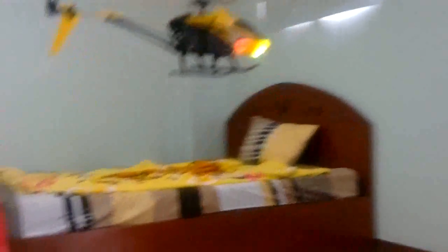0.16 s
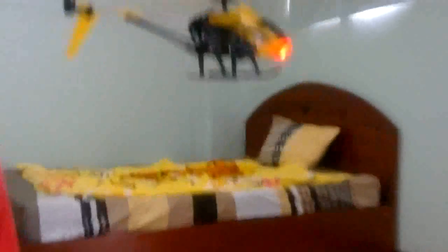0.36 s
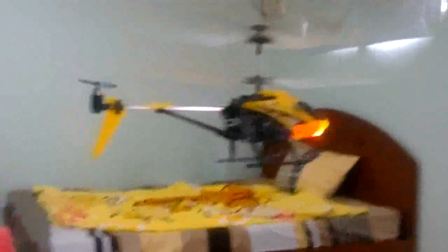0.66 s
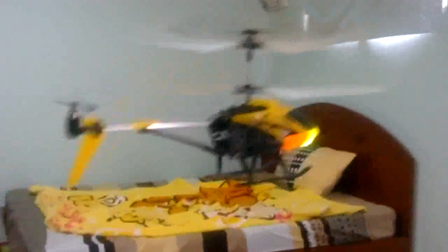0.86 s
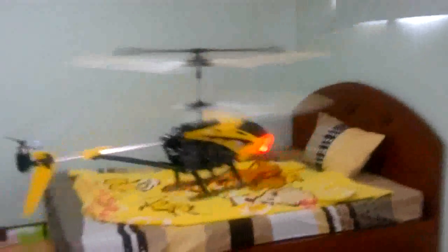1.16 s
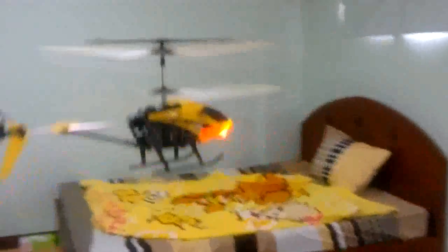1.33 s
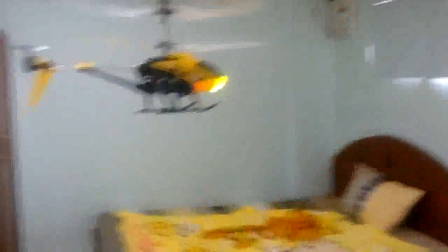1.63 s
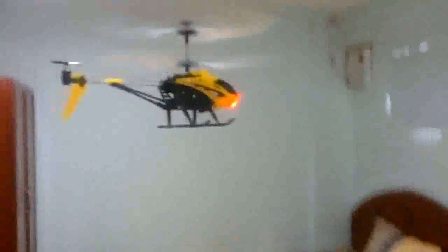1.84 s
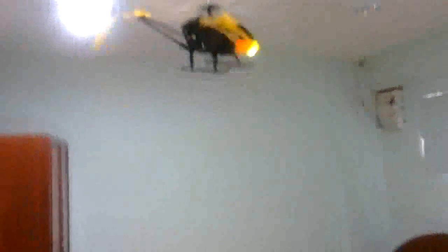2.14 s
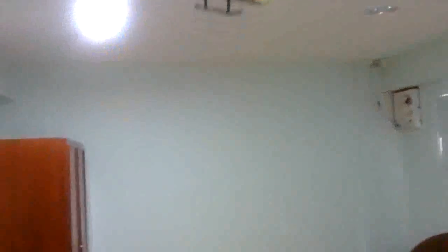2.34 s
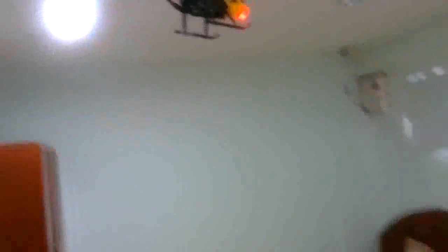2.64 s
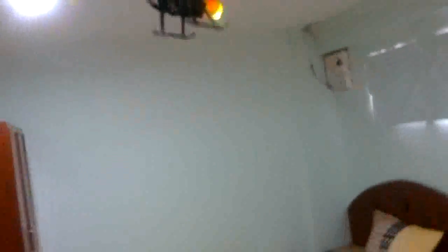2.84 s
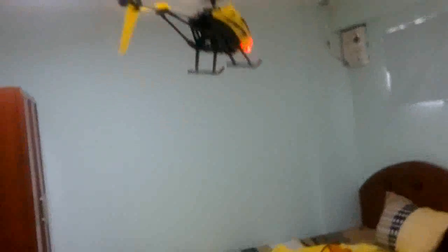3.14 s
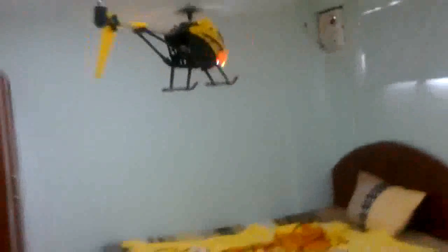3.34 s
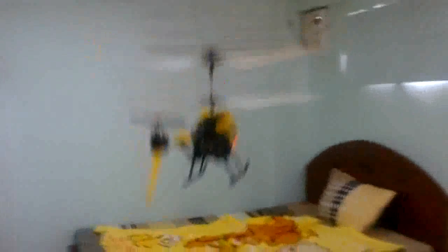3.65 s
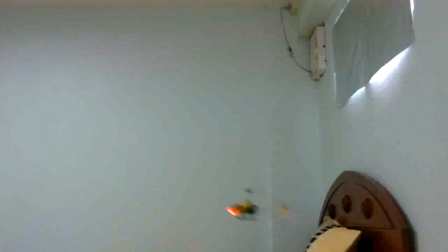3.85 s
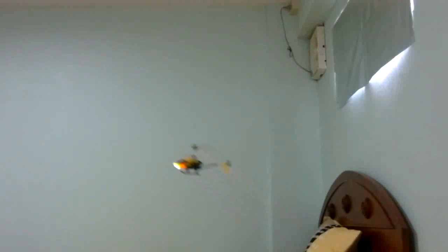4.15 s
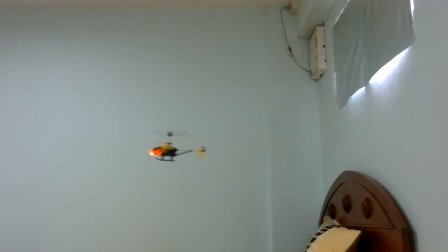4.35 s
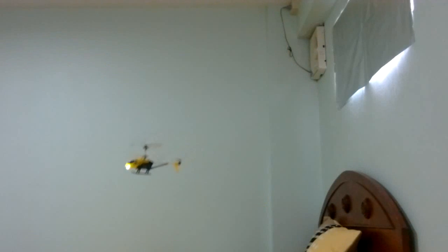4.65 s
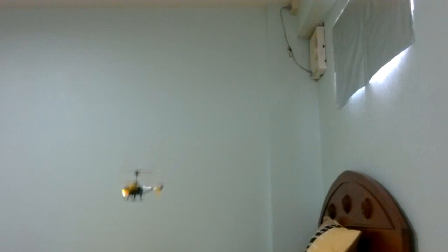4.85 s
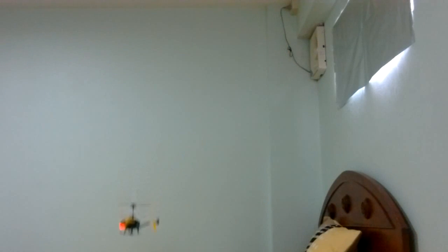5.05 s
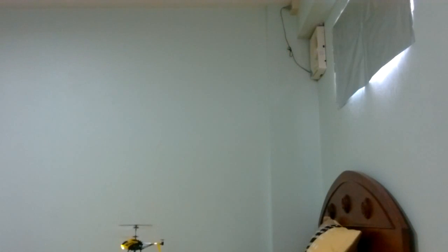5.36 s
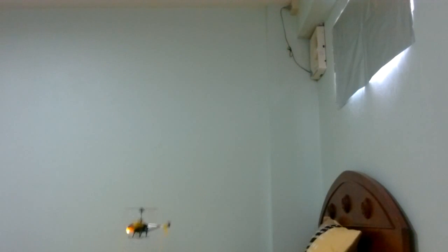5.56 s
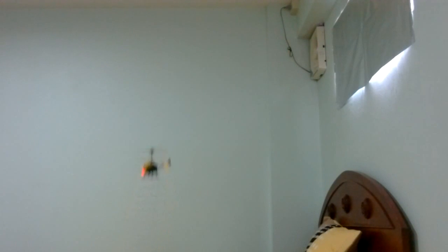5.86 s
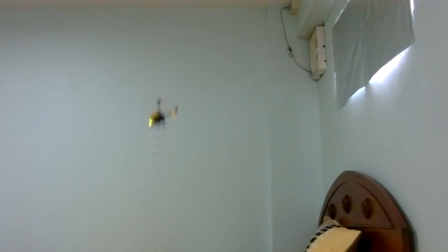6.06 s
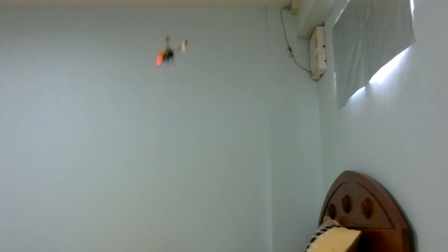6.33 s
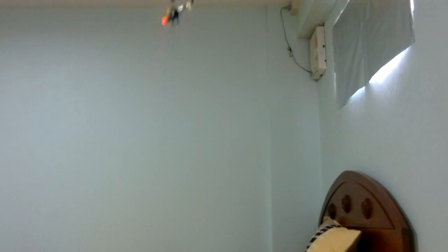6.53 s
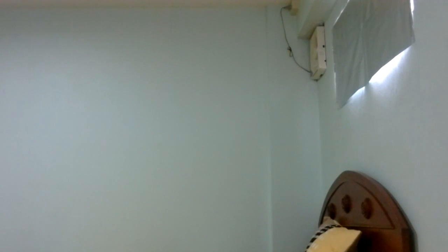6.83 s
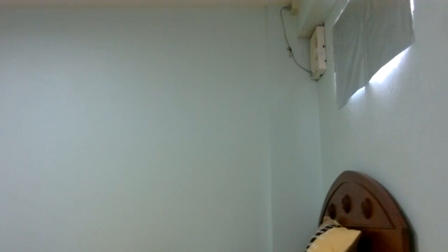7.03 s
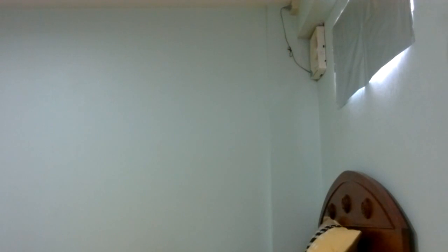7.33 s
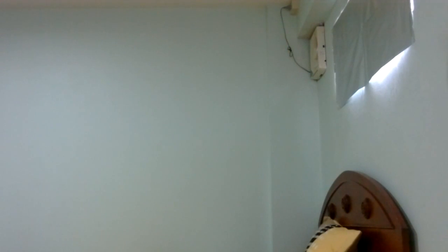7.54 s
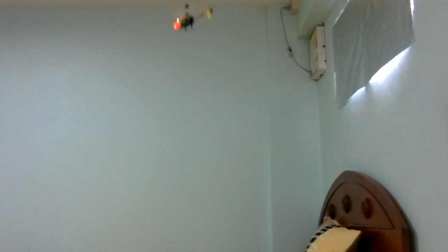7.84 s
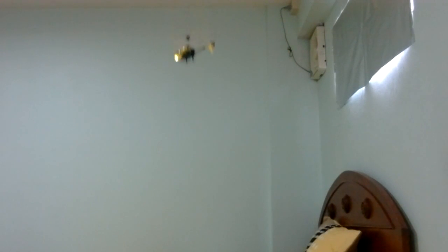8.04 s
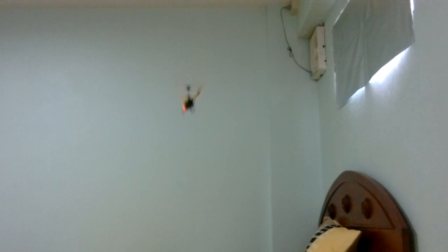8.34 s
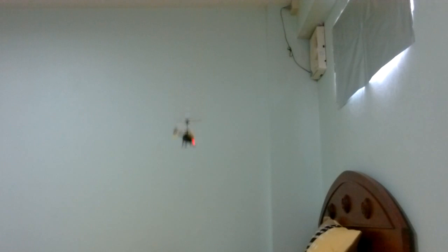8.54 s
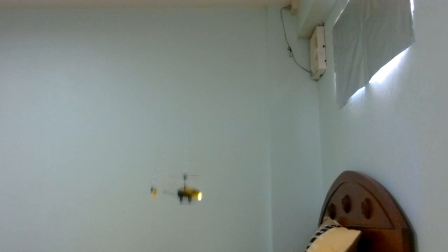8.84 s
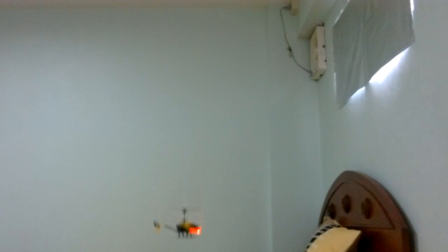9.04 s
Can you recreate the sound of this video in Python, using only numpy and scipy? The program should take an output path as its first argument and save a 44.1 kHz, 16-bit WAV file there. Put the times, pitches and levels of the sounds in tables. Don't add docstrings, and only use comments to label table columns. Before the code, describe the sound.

From the start a toy helicopter whines close by in a small hard-walled bedroom: two unsteady gear tones around 2.5 and 2.75 kHz, rough and beating, with gritty plastic hiss, thin overtones, weak motor hum and soft blade thrum. Pitch holds fairly steady until about 2.1 s, sags quickly by 2.5 s, then partly recovers around 2.9 s. At about 3.85 s the sound drops to silence for a twentieth of a second and returns abruptly, roughly half as loud and more distant. The whine falls from 4.2 to about 4.9 s, climbs strongly to a peak near 6 s with quick pitch kicks, then sinks gradually toward 7.75 s. Another brief upward kick comes near 8.4 s, and it rises again to the end at 9.2 s. Faint low rumble and handling bumps lie underneath; the highest treble is missing.

```python
import sys
import numpy as np
from scipy import signal
from scipy.fft import rfft, irfft, next_fast_len
from scipy.io import wavfile
from scipy.ndimage import uniform_filter1d, map_coordinates

SR = 44100
rng = np.random.default_rng(int(sys.argv[2]) if len(sys.argv) > 2 else 0)


def int16_out(signal):
    q = np.round(np.clip(np.atleast_2d(signal).T, -1, 1) * 32767)
    wavfile.write(sys.argv[1], SR, q.astype(np.int16))


def undo_db(level):
    steps = np.asarray(level, float) / 20
    return 10 ** steps


N = 405279
TIME = np.arange(N) / SR

TEETH = 7
CHOP_HZ = 541
BLADE_PASS = 0.0603
CUT_START_S, CUT_END_S = 3.8482, 3.8948
BEAM_S, MODE_S = 0.16, 0.19
# time_s, apparent_distance_m
DISTANCE = [(0, 0.98), (2.1, 0.99), (2.5, 1.11), (3.1, 0.91), (3.85, 1.02), (3.89, 1.79), (4.55, 2.2),
            (5.4, 1.88), (6.1, 2.23), (6.5, 2.35), (7.0, 2.14), (7.85, 2.3), (8.3, 2.02), (8.75, 2.03),
            (9.19, 1.74)]


def unit(x):
    return x / np.sqrt(np.mean(x ** 2) + 1e-20)


def along(points, hz):
    f, v = np.transpose(points)
    return np.interp(np.log(hz + 1), np.log(f + 1), v, left=v[0], right=v[-1])


def curve(rows):
    s, value = np.transpose(rows)
    return np.interp(TIME, s, value)


def wobble(rate):
    knots = rng.standard_normal(int(N * rate / SR) + 4)
    return map_coordinates(knots, [np.arange(N) * rate / SR])


def swells(rows, half_s):
    return sum(db * np.exp(-((TIME - s) / half_s) ** 2) for s, db in rows)


def filtered(x, response):
    m = next_fast_len(N + SR // 2)
    return irfft(rfft(x, m) * response(np.fft.rfftfreq(m, 1 / SR)), m)[:N]


def rush(spectrum, patchy_db, bins, frames):
    z = signal.stft(rng.standard_normal(N), nperseg=1024)[2]
    patches = uniform_filter1d(rng.standard_normal(z.shape), size=bins, axis=0)
    patches = uniform_filter1d(patches, size=frames, axis=1)
    noise = signal.istft(z * undo_db(patchy_db * unit(patches)), nperseg=1024)[1][:N]
    return unit(filtered(noise, lambda hz: undo_db(along(spectrum, hz))))


def turns(hz):
    return 2 * np.pi * np.cumsum(hz) / SR


def tone(phase, fade_db, blur):
    return np.sqrt(2) * undo_db(fade_db * wobble(9)) * np.sin(phase + blur * wobble(40))


def speed(throttle, nudges):
    steering = sum(hz * np.exp(-np.abs((TIME - s) / half) ** 3) for s, half, hz in nudges)
    return curve(throttle) + 3 * wobble(9) + steering


def motor(hz, rings, crests, orders, hiss_db, eccentric):
    mesh_db = hiss_db + along(rings, hz) + swells(crests, half_s=0.075)
    surge = np.abs(uniform_filter1d(np.gradient(hz) * SR, size=2000))
    mesh = turns(hz + 0.012 * surge * wobble(70))
    warble = 1 + eccentric * np.sin(BLADE_PASS / 4 * mesh) + 0.2 * wobble(60)
    mesh_gain = undo_db(mesh_db - 0.0028 * surge)
    main = mesh_gain * warble * undo_db(2.4 * wobble(32)) * tone(mesh, fade_db=0, blur=0.27)
    rest = 0
    for k, db in orders:
        flicker = undo_db(2.5 * wobble(25))
        line = tone(mesh * k / TEETH, fade_db=2.5, blur=0.072 * k)
        rest = rest + undo_db(hiss_db + db) * line * flicker
    return main, rest, mesh


def lower_motor(hz, hiss_db):
    # mesh_hz, level_db over the gear hiss
    rings = [(2150, -8.5), (2250, -4.5), (2480, -4), (2650, -6.5)]
    # time_s, change_db
    crests = [(.3, 6), (.47, 11.5), (.62, 5), (.98, 9.5), (1.38, 2), (1.97, 10), (2.28, 8.5), (2.5, 1.5),
              (2.88, 3.5), (3.24, 6.5), (3.38, 7), (3.68, 3.5), (4.02, 1), (4.18, 7.5), (4.45, 5.5),
              (5.17, 9), (5.38, 4), (5.56, 2), (5.75, -15), (6.1, -2), (6.45, 8.5), (6.75, 9), (6.98, 12.5),
              (7.25, 4), (7.55, 2.5), (7.8, 6.5), (8.18, 3)]
    # order, level_db over the gear hiss
    orders = [(6, -11), (6.72, -16), (7.3, -19), (8, -18), (9, -14), (21, -24)]
    return motor(hz, rings, crests, orders, hiss_db, eccentric=0.2)


def upper_motor(hz, hiss_db):
    # mesh_hz, level_db over the gear hiss
    rings = [(2400, -12.5), (2500, -4.5), (2580, -2), (2760, 1), (3000, 1.5), (3200, -1)]
    # time_s, change_db
    crests = [(.12, -10.5), (0.501, -6), (.63, 4.5), (0.749, -0.5), (1.03, -7), (1.35, 5.5), (1.43, -5),
              (2.0, 0.5), (2.25, -13), (2.38, 6), (3.05, 4), (3.5, -3.5), (3.68, 5), (3.89, -15), (4.62, 6),
              (4.75, -11), (5.12, -8), (5.22, 8), (5.75, 5), (6.55, 7), (6.88, -3), (7.0, 3), (7.25, 2),
              (7.38, -14), (8.0, 5), (8.22, -7), (8.5, -3), (8.6, 3.5), (9.09, 9.5), (9.19, -16)]
    # order, level_db over the gear hiss
    orders = [(5, -15), (6.7, -19), (7.28, -17), (8, -14), (20, -24), (21, -19)]
    return motor(hz, rings, crests, orders, hiss_db, eccentric=0.18)


def chopping_sidebands(low_mesh, up_mesh, chop, hiss_db):
    # chop_multiple, level_db over the gear hiss
    weak_bands = [(2, -18), (-1, -22.5)]
    # time_s, rise_db
    beams = [
        (4.55, 10.2),
        (4.95, 14),
        (7.5, 5),
    ]
    upper = 0
    for k, db in weak_bands:
        phase = up_mesh + k * chop + 0.8 * wobble(90)
        upper = upper + undo_db(hiss_db + db) * tone(phase, fade_db=4.5, blur=0.9)
    lower = undo_db(hiss_db - 18 + swells(beams, BEAM_S)) * tone(low_mesh + chop, fade_db=2.0, blur=0.44)
    return upper / curve(DISTANCE) ** 0.85 + lower


def shell_radiation(x):
    # freq_hz, gain_db
    radiates = [(1700, -17), (2200, -2.5), (2900, 0.5), (3250, -4.5), (3550, -10.5), (3830, 7),
                (4300, -2.5), (5200, -2), (6200, -2), (8300, 0.5), (9500, 0.5)]
    return filtered(x, lambda hz: undo_db(along(radiates, hz)))


def beamed_overtones(low_hz, up_hz, low_mesh, up_mesh, chop, hiss_db):
    # freq_hz, level_db over the gear hiss
    doubles = [
        [(4300, -15), (4600, -14), (4950, -11), (5300, -14.5)],
        [(4750, -6.5), (5150, -8.5), (5550, -7.5), (5750, -15), (6400, -14)],
    ]
    # time_s, change_db
    glide_dips = [
        (2.27, -11),
        (4.15, -4),
        (5.25, -14),
        (7.8, -2),
        (8.9, -2),
    ]
    # freq_hz, level_db over the gear hiss
    sideband = [(2900, -3.5), (3000, -5.5), (3110, -10), (3300, -14.5), (3500, -26)]
    # time_s, rise_db
    beams = [(2.0, 5.8), (3.45, 7.8), (4.1, 14), (5.25, 17), (5.6, 16), (7.75, 11.2), (8.55, 13.3),
             (9.15, 12)]
    low_db, up_db = [
        along(ring, 2 * hz) + wobble(4) + swells(glide_dips, BEAM_S)
        for ring, hz in zip(doubles, (low_hz, up_hz))
    ]
    band_db = along(sideband, up_hz + CHOP_HZ)
    sixth_db = -15.5 + swells(beams, BEAM_S)
    # phase, radians of fast tooth jitter, dB over the gear hiss
    lines = [
        (2 * low_mesh, 0.8, low_db),
        (2 * up_mesh, 0.9, up_db),
        (up_mesh + chop, 0.3, band_db),
        (up_mesh * 6 / TEETH, 0.3, sixth_db),
    ]

    def flicker():
        return undo_db(3 * wobble(35) - 2)

    out = undo_db(hiss_db + sixth_db / 2 - 7) * flicker() * tone(up_mesh * 13 / TEETH, fade_db=3, blur=1)
    for phase, jitter, db in lines:
        line = tone(phase + jitter * wobble(90), fade_db=1.2, blur=0.5)
        out = out + undo_db(hiss_db + db) * flicker() * line
    return out


def gear_rattle(low_mesh, up_mesh, hiss_db):
    # freq_hz, density_db per Hz
    hiss_spectrum = [(1700, -50), (2100, -0.5), (2900, -18), (3400, -5.5), (3800, -0.5), (4300, -5),
                     (5000, -0.5), (5600, -3), (6400, -6), (8300, -5), (10200, -7.5), (10800, -20.5)]
    # freq_hz, density_db per Hz
    shell_spectrum = [(1500, -36), (1900, -19), (2200, -7.5), (2500, -0.5), (2900, -0.5), (3200, -11),
                      (3500, -15), (4500, -46.5)]
    shaft = 1 + 0.22 * np.sin(low_mesh / TEETH) + 0.2 * np.sin(up_mesh / TEETH)
    flutter = undo_db(0.21 * wobble(30) + 0.2 * wobble(16))
    hiss = unit(shaft * flutter * rush(hiss_spectrum, patchy_db=0.5, bins=12, frames=6))
    boom = unit(flutter * rush(shell_spectrum, patchy_db=4.0, bins=1, frames=14))
    return undo_db(hiss_db) * hiss + undo_db(hiss_db - 1.5) * boom


def helicopter():
    # time_s, mesh_hz
    low_throttle = [(0, 2477), (2.1, 2476), (2.28, 2410), (2.47, 2265), (2.68, 2208), (3.2, 2300),
                    (3.85, 2305), (3.89, 2450), (4.2, 2445), (4.45, 2240), (5.0, 2140), (5.15, 2310),
                    (5.52, 2580), (6.17, 2655), (6.92, 2338), (7.75, 2242), (8.9, 2255), (9.19, 2334)]
    # time_s, mesh_hz
    up_throttle = [(0, 2754), (2.17, 2774), (2.45, 2386), (2.7, 2378), (2.85, 2580), (3.85, 2592),
                   (3.89, 2745), (4.16, 2818), (4.42, 2439), (4.8, 2370), (5.12, 2575), (5.42, 2952),
                   (5.93, 3033), (6.08, 2863), (6.75, 2548), (7.75, 2430), (8.9, 2549), (9.19, 2770)]
    # centre_s, half_length_s, change_hz
    low_nudges = [
        (5.8, .2, 18),
        (8.244, .17, 34.5),
        (8.499, 0.0484, -29),
    ]
    # centre_s, half_length_s, change_hz
    up_nudges = [
        (.95, .25, -16),
        (4.93, 0.075, 140),
        (5.3, 0.081, 35),
        (6.0, 0.051, 250),
        (6.399, .2, 70),
        (8.42, .1, 130),
        (8.4, .3, 40.5),
    ]
    low_hz, up_hz = speed(low_throttle, low_nudges), speed(up_throttle, up_nudges)
    hiss_db = -25.5 + 20 * np.log10((low_hz / 2467) ** 1.67 / curve(DISTANCE))
    lower, low_orders, low_mesh = lower_motor(low_hz, hiss_db)
    upper, up_orders, up_mesh = upper_motor(up_hz, hiss_db)
    chop = turns(np.full(N, CHOP_HZ))
    bands = chopping_sidebands(low_mesh, up_mesh, chop, hiss_db)
    whine = lower + upper + shell_radiation(low_orders + up_orders + bands)
    whine = whine + beamed_overtones(low_hz, up_hz, low_mesh, up_mesh, chop, hiss_db)
    return whine, gear_rattle(low_mesh, up_mesh, hiss_db), low_mesh, up_mesh


def downwash(wash_db):
    # freq_hz, density_db per Hz
    spectrum = [(60, -72.5), (130, -33.5), (200, -20), (300, -18), (400, -14), (531, -9.5), (849, -7.5),
                (1630, -5.5), (1900, -5), (2470, -28.5), (4180, -120)]
    return undo_db(wash_db) * rush(spectrum, patchy_db=1.5, bins=3, frames=8)


def blade_thrum(low_mesh, wash_db):
    # multiple, level_db over the downwash
    overtones = [(2, -23), (3, -18), (4, -17.5)]
    # time_s, change_db
    modes = [(.1, -4.5), (2.0, 4.5), (4.03, 21), (4.4, 11), (5.33, 17), (5.66, 21.5), (6.0, 17), (6.75, 7),
             (8.5, -21), (9.2, 18)]
    blade = BLADE_PASS * low_mesh
    thrum_db = -64.5 - 20 * 1.67 * np.log10(curve(DISTANCE)) + swells(modes, MODE_S)
    out = undo_db(thrum_db) * tone(blade, fade_db=1.5, blur=0.4)
    for k, db in overtones:
        out = out + undo_db(wash_db + db) * tone(k * blade, fade_db=3.6, blur=0.33)
    slap = np.exp(-((TIME - 6.02) / 0.081) ** 4)
    return out + undo_db(-44) * slap * np.sin(3 * 1.02 * blade)


def shaft_hum(low_mesh, up_mesh, wash_db):
    lower = undo_db(wash_db - 23.5) * tone(low_mesh / TEETH, fade_db=1.0, blur=0.36)
    upper = undo_db(wash_db - 18) * tone(up_mesh / TEETH, fade_db=2.5, blur=0.3)
    return lower + upper


def controller_hum():
    # time_s, change_db
    modes = [(.0, 5), (.6, -2), (3.85, -10.5), (4.4, 1), (4.8, 5.5), (5.3, -5), (5.95, -4), (6.25, 9),
             (6.78, 9.5), (7.3, -21), (8.65, -12), (9.1, -16)]
    chop = tone(turns(np.full(N, CHOP_HZ)), fade_db=2.5, blur=0.2)
    return undo_db(-56 + swells(modes, MODE_S)) * chop


def room_floor():
    # freq_hz, level_db
    steady_tones = [(1176, -57.5), (579, -65)]
    # freq_hz, density_db per Hz
    spectrum = [(20, -10), (35, 3), (75, 8), (105, -6), (140, -31)]
    # time_s, rise_db
    shakes = [(.35, 15), (.75, 20), (1.1, 19), (1.8, 15), (2.6, 18), (3.5, 10), (4.0, 11), (4.6, 16),
              (6.8, 9.5), (7.85, 19)]
    near_db = 5.8 * (TIME < CUT_START_S)
    floor_db = -87.5 + swells(shakes, MODE_S) + 4.5 * wobble(7)
    out = undo_db(floor_db) * rush(spectrum, patchy_db=2, bins=2, frames=4)
    for hz, db in steady_tones:
        out = out + undo_db(db - near_db) * tone(turns(np.full(N, hz)), fade_db=3.0, blur=0.16)
    return out


def air(low_mesh, up_mesh):
    wash_db = -46 + 1.08 * wobble(4.1)
    rotors = downwash(wash_db) + blade_thrum(low_mesh, wash_db) + shaft_hum(low_mesh, up_mesh, wash_db)
    return rotors + controller_hum() + room_floor()


def bedroom(x):
    # freq_hz, t60_s
    walls = [(200, 0.66), (2500, 1), (10000, 0.28)]
    hz, t, z = signal.stft(rng.standard_normal(SR // 2), SR, nperseg=256)
    decay = undo_db(-60 * t / along(walls, hz)[:, None])
    tail = signal.istft(z * decay, SR, nperseg=256)[1]
    delayed = np.pad(x, (300, 0))
    return signal.fftconvolve(delayed, tail / np.linalg.norm(tail))[:N]


def thrifty_camera(x):
    # freq_hz, level_db over the mean bin
    masking = [(30, -34), (80, -28), (115, -25), (160, -25), (200, -19), (330, -17), (430, -25),
               (1600, -23), (1900, -12), (2150, -9), (2400, -12), (3400, -10), (3800, -14), (4400, -7),
               (5200, -13), (5900, -8), (6800, -7.5), (8000, -15), (10330, -15), (10400, -4.5)]
    frame = dict(nperseg=4096, window="cosine")
    hz, _, z = signal.stft(x, SR, **frame)
    mean_bin = np.sqrt(np.mean(np.abs(z) ** 2, axis=0))
    band = np.sqrt(uniform_filter1d(np.abs(z) ** 2, size=3, axis=0))
    restless = unit(uniform_filter1d(rng.standard_normal(z.shape), size=8, axis=0))
    spent = rng.standard_normal(z.shape[1])
    louder_db = 4 * np.log10(mean_bin / np.median(mean_bin) + 1e-3)
    mask_db = along(masking, hz)[:, None] + 2 * restless + 1.2 * spent + louder_db
    leak = undo_db(-22) * (hz < 10330)[:, None]
    kept = np.where(band > mean_bin * undo_db(mask_db), 1, leak) * (hz < 10790)[:, None]
    return signal.istft(z * kept, SR, **frame)[1][:N]


def scene():
    whine, rattle, low_mesh, up_mesh = helicopter()
    mono = whine + undo_db(-12.5) * bedroom(whine) + rattle + air(low_mesh, up_mesh)
    return np.array([mono, mono])


def band_limit(x):
    return signal.sosfilt(signal.butter(12, 15500, fs=SR, output="sos"), x)


def record(dry):
    sounding = (TIME < CUT_START_S) | (TIME > CUT_END_S)
    kept = thrifty_camera(dry[0]) * sounding
    return band_limit(np.array([kept, kept]))


dry = scene()
out = record(dry)
int16_out(out)
```